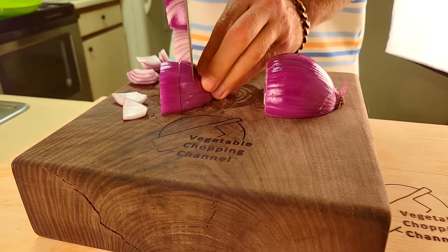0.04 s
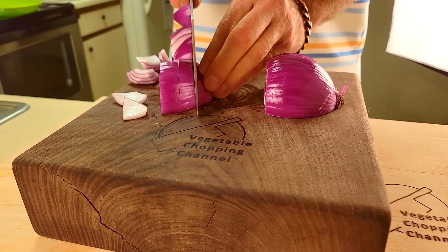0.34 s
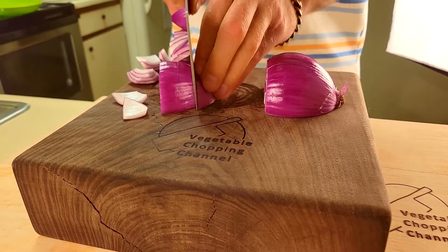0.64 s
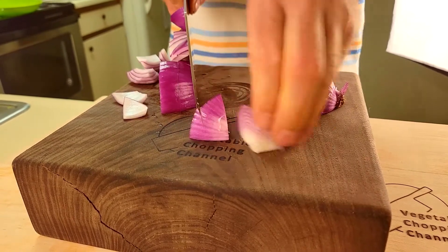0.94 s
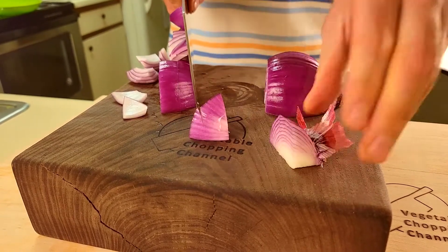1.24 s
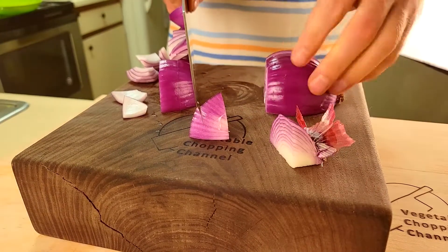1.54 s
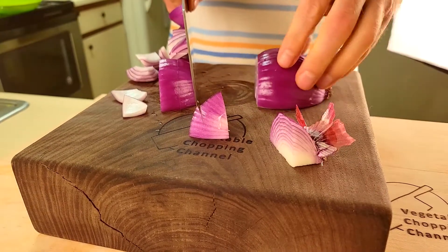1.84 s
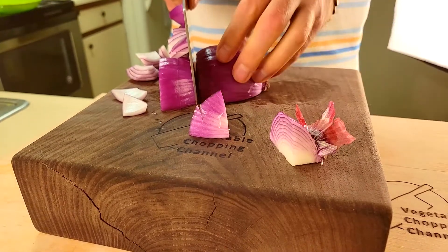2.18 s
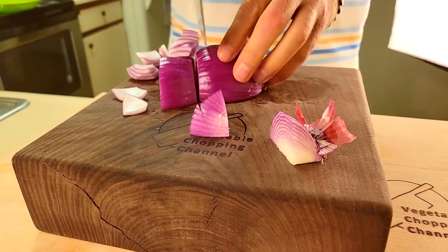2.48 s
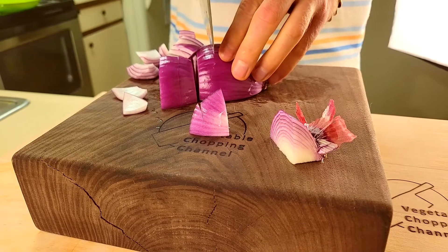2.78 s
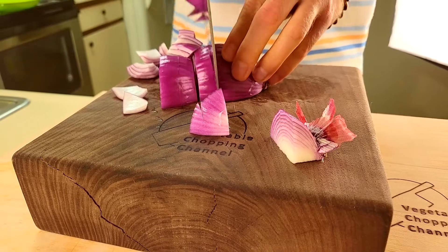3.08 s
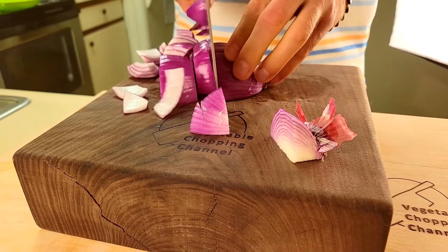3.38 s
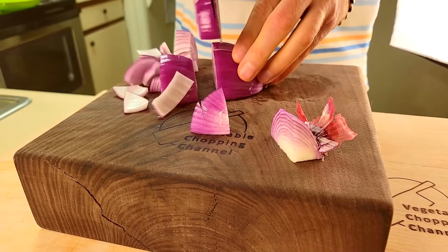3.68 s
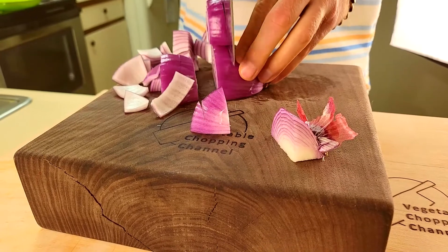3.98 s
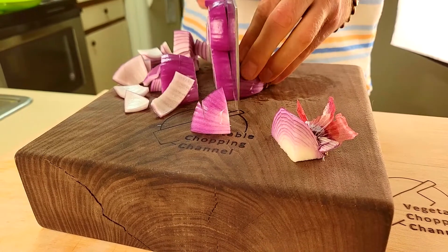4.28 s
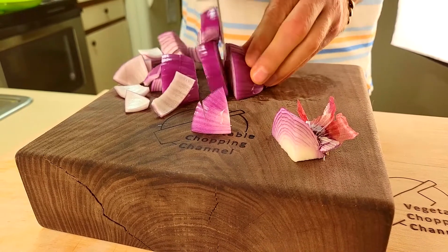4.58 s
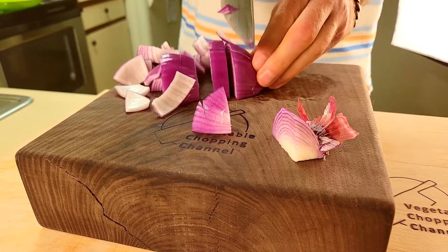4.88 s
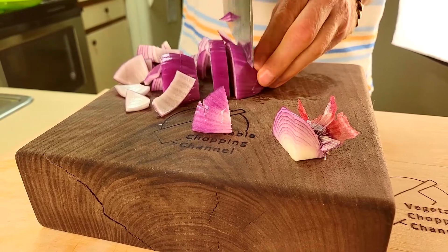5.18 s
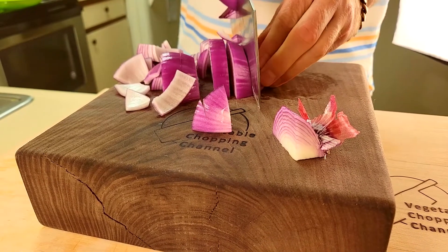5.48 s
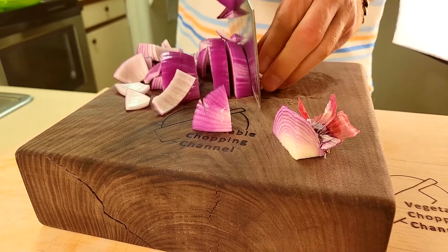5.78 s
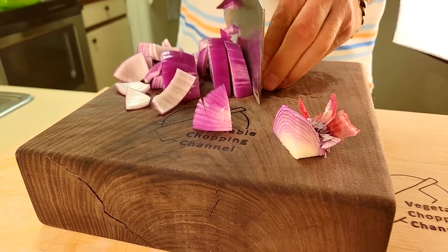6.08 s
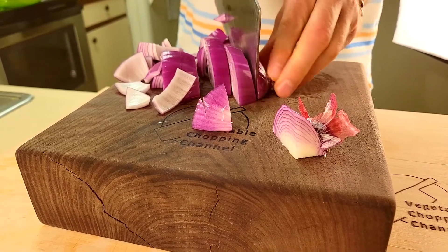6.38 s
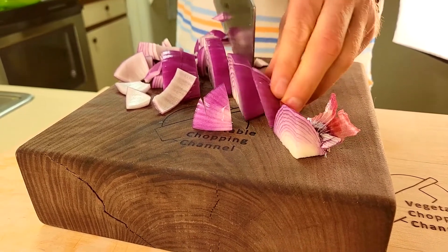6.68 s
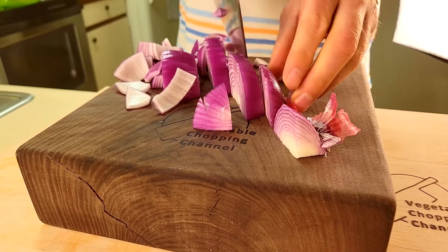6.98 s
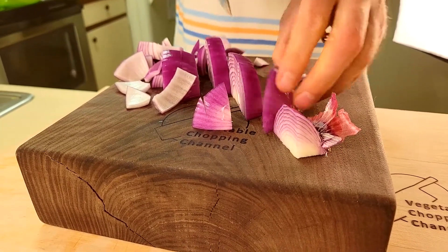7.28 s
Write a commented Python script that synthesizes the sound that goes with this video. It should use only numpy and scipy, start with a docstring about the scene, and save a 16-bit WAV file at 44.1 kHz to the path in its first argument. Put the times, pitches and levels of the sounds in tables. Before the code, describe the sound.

Close, unhurried onion slicing: skin snaps, juicy flesh crunches and the blade knocks on thick wood over a faint appliance hum.

```python
"""In a kitchen, a chef's knife slices a red onion on a thick wooden block, close to a stereo microphone.
The edge snaps the skin, crunches through countless wet cells and lands on the block with a thump.
The steel rings faintly. Between cuts the fingers shift the pieces, which rustle, creak and squeak
as they stick and slip. An appliance hums in the room."""
import sys
import numpy as np
from scipy import signal
from scipy.fft import rfft, irfft
from scipy.io import wavfile
from scipy.ndimage import uniform_filter1d

SR = 44100
rng = np.random.default_rng(int(sys.argv[2]) if len(sys.argv) > 2 else 0)


def store_pcm(level_fs):
    """Save levels as 16-bit WAV."""
    pcm = np.round(np.clip(level_fs, -1, 1) * 32767).astype(np.int16)
    wavfile.write(sys.argv[1], SR, np.atleast_2d(pcm).T)


N = 323253
TIME = np.arange(N) / SR

# The tone that thin skin and the blade's face give to bursting cells. Each row: frequency in Hz, gain in dB.
CELL_SPECTRUM = [(400, -30.5), (750, -14.5), (1050, -20), (1390, -7), (2050, -7), (2650, -7), (3250, -0.5),
                 (4100, -1), (5200, -3), (6500, -4.5), (9700, -11.5), (11200, -3), (12900, 7.5), (15800, 0)]
# The notes of the steel blade. Each row: pitch in Hz, relative level in dB, seconds to fade by 60 dB.
BLADE_NOTES = [(1498, -6, 0.18), (3760, -14.5, 0.18), (4270, 6, 0.037), (5660, -4, 0.13), (7105, 6, 0.028),
               (7820, -0.5, 0.059), (11400, -2, .03)]


def amp(db):
    """Turns decibels into a gain."""
    return 10 ** (np.asarray(db) / 20)


def unit(x):
    """Scales a signal to an average (rms) level of 1."""
    return x / np.sqrt(np.mean(x ** 2) + 1e-20)


def read(points, hz):
    """Reads a curve between its points, on a logarithmic frequency axis."""
    f, value = np.transpose(points)
    return np.interp(np.log(hz + 1), np.log(f + 1), value)


def add(mix, s, sound):
    """Mixes a sound in at s seconds."""
    part = mix[max(round(s * SR), 0):][:len(sound)]
    part += sound[:len(part)]


def band(x, lo_hz, hi_hz):
    """Keeps what lies between two frequencies."""
    return signal.sosfilt(signal.butter(3, [lo_hz, min(hi_hz, .49 * SR)], "band", fs=SR, output="sos"), x)


def colour(x, spectrum, size=2048):
    """Shapes the tone with a filter that lets clicks keep their sharp front."""
    log_gain = np.log(amp(np.maximum(read(spectrum, abs(np.fft.fftfreq(size, 1 / SR))), -90)))
    taps = np.fft.ifft(np.exp(np.conj(signal.hilbert(log_gain)))).real[:size // 2]
    return signal.oaconvolve(x, taps)[:len(x)]


def bursts(per_s, spread_db):
    """Random clicks: mostly tiny, a few large."""
    size = amp(spread_db * np.minimum(rng.exponential(1, N), 4.5))
    return unit(size * rng.choice([-1, 1], N) * (rng.random(N) < per_s / SR))


def three_bands(clicks, spectrum):
    """Colours clicks and splits them into equally strong bands: fleshy middle, crisp highs, top fizz."""
    x = colour(clicks, spectrum)
    return unit(band(x, 380, 2300)), unit(band(x, 2400, 10000)), unit(band(x, 10200, 19000))


def slide(start, length_s, skew=0.51, power=2.53):
    """The speed of one sliding movement: it rises quickly and falls gradually."""
    progress = np.linspace(0, 1, round(length_s * SR))
    speed = np.zeros(N)
    add(speed, start, abs(np.sin(np.pi * progress ** skew)) ** power)
    return speed


def hum_and_air(waver_db=0.85, hum_lag_s=0.00013, air_db=-55.5, shared_bass=0.95):
    """An appliance's mains hum wavers a little over soft room noise."""
    # The hum's tones. Each row: pitch in Hz, level in dB.
    hum_tones = [(119.5, -52), (240, -93)]
    # The room noise. Each row: frequency in Hz, relative level in dB.
    air_spectrum = [(15, -56.5), (25, -18.5), (70, -4), (123, -0.5), (148, -18.5), (174, -25.5), (211, -25),
                    (637, -40), (1390, -39), (2590, -46), (7420, -48.5), (9720, -56.5), (13400, -49),
                    (15800, -49)]
    waver = amp(waver_db * unit(band(rng.standard_normal(N), 0.87, 18.0)))
    stereo_time = TIME - [[hum_lag_s], [0]]
    hum = sum(amp(db) * np.sqrt(2) * np.sin(2 * np.pi * hz * stereo_time) for hz, db in hum_tones)
    left, right, both = (colour(rng.standard_normal(N), air_spectrum) for _ in range(3))
    bass = signal.butter(2, 300, fs=SR, output="sos")
    air = np.array([left, right])
    air += shared_bass * signal.sosfilt(bass, both - air)  # long waves reach both sides alike
    return waver * hum + amp(air_db) * unit(air)


def rustle(level_db=-3):
    """Damp skin catches and lets go in tiny slips as pieces slide on blade, block and fingers."""
    # Each row: start and length in seconds, relative level in dB, middle and fizz in dB against the highs.
    slides = [(0.0, 0.14, -58, -14, -3), (0.333, 0.19, -55.5, -0.5, -3), (0.455, 0.19, -79, 13, -4),
              (0.599, 0.12, -63, -7, -4), (0.68, 0.39, -76.5, -3, -5), (0.854, 0.4, -60.5, -19.5, 4),
              (1.13, 0.19, -74, -1, -4), (1.474, 0.09, -71.5, -2, -6), (1.74, 0.3, -76.5, -4, 1),
              (1.885, 0.53, -65, -11.5, -4.5), (2.301, 0.18, -66, -22, -10), (2.616, 0.22, -73.5, -1, -15),
              (3.191, .2, -57.5, 6, -8), (3.344, 0.38, -77, -3, -8), (3.657, 0.11, -69, 1, -12),
              (3.835, 0.17, -59, -2.5, -2), (4.287, 0.22, -59.5, 8.5, -12), (4.459, 0.077, -62, -7, -5),
              (4.517, 0.3, -71, 8, -1), (4.658, 0.18, -71, -13, -6), (4.867, 0.089, -47, -6.5, -6),
              (4.916, 0.15, -61, -9, -21), (5.03, .1, -54, -6, 5.5), (5.46, 0.15, -59, -6.5, -4),
              (5.58, 0.37, -79, -3, -1), (6.55, 0.3, -65, -7, -3), (6.867, 0.19, -77, -10, 4),
              (7.217, 0.19, -69, -17, -1)]
    # The tone of the rubbing. Each row: frequency in Hz, gain in dB.
    rub_spectrum = [(410, -26.5), (700, -12), (798, -4), (1090, -13), (1550, -7), (1960, -13.5),
                    (3180, -7.5), (4760, -7.5), (6100, -6), (9500, -14), (13000, -0.5), (15800, -8)]
    middle, crisp, fizz = three_bands(bursts(per_s=1100, spread_db=3.5), rub_spectrum)
    out = amp(-83.5) * (crisp + fizz)  # the fingers never rest entirely
    for start, length_s, db, middle_db, fizz_db in slides:
        out += amp(db) * slide(start, length_s) * (crisp + amp(middle_db) * middle + amp(fizz_db) * fizz)
    return amp(level_db) * out


def snaps(rise_s=0.00048, fade_s=0.0041, ticks_per_s=13, level_db=-1):
    """Tight skin gives way in a short rush of bursting cells. Damp skin also ticks faintly at random."""
    # Snaps and the louder wet ticks. Each row: start in seconds, relative level in dB,
    # boost of the middle in dB, boost of the fizz in dB.
    skin_snaps = [(0.028, -46, 5, -7), (0.074, -35.5, -24, -5), (0.086, -47.5, 11, -3), (0.874, -62, -4, 7),
                  (0.944, -53, -11, 8), (1.488, -55.5, -19, -5), (1.555, -62, 8.5, 0),
                  (1.735, -70, -11, 11), (2.197, -57.5, 0.5, 5), (2.26, -62.5, 0, -4), (2.348, -59, 4, -8),
                  (2.418, -53.5, -14, 1), (2.438, -53, -7, 2), (2.588, -36, 0.5, -1.5),
                  (2.745, -60, -6, -14), (2.798, -42, 4, -0.5), (3.19, -33, 0, -3), (3.436, -61, -1, -10),
                  (3.662, -56, -16, 4), (3.683, -56.5, 14.5, -14), (3.711, -59, -16, 2),
                  (3.836, -37.5, 0, -2.5), (3.877, -49.5, -1, -2), (4.274, -32.5, 2.5, 1),
                  (4.305, -62, 1, -5), (4.612, -61.5, 6, 6), (4.684, -56, -18, -7), (4.722, -62, -16, 7),
                  (4.782, -58.5, -14, 0), (5.045, -37.5, -1, -9), (5.16, -53, -9, -3),
                  (5.874, -63, -5, -20), (6.435, -62, -13, 2), (6.471, -43.5, -4, -9), (6.561, -47, 0, -10),
                  (6.71, -54.5, -3.5, -3), (6.734, -66.5, -9, 15), (6.943, -58.5, -7, -1),
                  (7.072, -64, -12, 3), (7.201, -63, -7.5, -10), (7.259, -55.5, -15, -5),
                  (7.271, -57, -16, 3)]
    middle, crisp, fizz = three_bands(bursts(per_s=9000, spread_db=0.5), CELL_SPECTRUM)
    tick_db = -76 + 3 * rng.standard_normal(N)
    ticks = [(TIME[i], tick_db[i], 0, 0) for i in np.flatnonzero(rng.random(N) < ticks_per_s / SR)]
    out = np.zeros(N)
    for start, db, middle_db, fizz_db in skin_snaps + ticks:
        part = slice(round(start * SR), round(start * SR) + SR // 8)
        t = TIME[part] - TIME[part][0]
        cells = crisp[part] + amp(middle_db - 6.5) * middle[part] + amp(fizz_db + 0.5) * fizz[part]
        add(out, start, amp(db) * cells * (1 - np.exp(-t / rise_s)) * np.exp(-t / fade_s))
    return amp(level_db) * out


def free_blade(skin, ring_db=-16):
    """Each snap sets the steel ringing faintly."""
    t = TIME[:SR // 3]
    ring = sum(amp(db - 60 * t / t60) * np.sin(2 * np.pi * hz * t) for hz, db, t60 in BLADE_NOTES)
    return amp(ring_db) * signal.oaconvolve(skin, ring / np.linalg.norm(ring))[:N]


def wedged_blade(cutting):
    """The blade, gripped and damped by the onion, lifts a few broad notes out of the cutting sound."""
    # Each row: pitch in Hz, width in Hz, gain in dB.
    damped_notes = [(1360, 100, 3.5), (2930, 250, -3), (3185, 80, 2), (3280, 177, -12), (3716, 110, -1.5),
                    (5880, 160, -4), (6400, 120, -9.5), (14070, 170, -26.5)]
    t = TIME[:SR // 20]
    ring = sum(amp(db) * 2 * np.pi * width / SR * np.exp(-np.pi * width * t) * np.cos(2 * np.pi * hz * t)
               for hz, width, db in damped_notes)
    return cutting + signal.oaconvolve(cutting, ring)[:N]


def stroke(start, deepest, end, swell_db, bite_s=0.0038, release_s=0.0033, ease_db_per_s=34.5):
    """A cut swells until the edge is deepest, then eases. Gives its on-off gain and dB below its peak."""
    t = np.arange(start, end + 8 * release_s, 1 / SR)
    gate = np.minimum((t - start) / bite_s, 1) * np.exp(-np.maximum(t - end, 0) / release_s)
    still_to_go = np.maximum((deepest - t) / (deepest - start), 0)
    under_db = swell_db * still_to_go ** 1.49 + ease_db_per_s * np.maximum(t - deepest, 0)
    return gate, under_db


def block_ring(rocking_db=0):
    """The block's notes: neighbours swing opposite ways, and the lowest is the whole block rocking."""
    # Each row: pitch in Hz, relative level in dB, seconds to fade by 60 dB.
    block_notes = [(44, -7.5, .32), (91, 2.5, .071), (92, -8, .18), (129, -10, .25), (245, -3.5, .147),
                   (318, -9, .09), (332, 5, .019), (450, -13, .07), (510, -9.5, .035), (685, -12, .04),
                   (800, -20, .025), (1040, -2.5, .02), (1360, -7.5, .026), (1890, -10, .016)]
    t = TIME[:SR // 2]
    notes = [(-1) ** k * amp(db - 60 * t / t60) * np.cos(2 * np.pi * hz * t)
             for k, (hz, db, t60) in enumerate(block_notes)]
    return amp(rocking_db) * notes[0] + sum(notes[1:])


def crunch(level_db=-3, shallow_fizz=0.14, shake_follows=0.58):
    """The edge bursts cells, unevenly as it meets layer after layer, and its drag shakes the block."""
    # Each row: start, deepest bite and end in seconds, relative level in dB, swell from the start in dB,
    # middle and fizz in dB against the highs, shaking of the block in dB.
    cuts = [(0.068, 0.155, 0.33, -42.5, 8.5, -9.5, -4.5, -48),
            (2.862, 3.097, 3.197, -40, 22.5, -12, -5.5, -55),
            (3.928, 4.253, 4.326, -41, 12, -9, -5.5, -57.5), (5.053, 5.283, 5.452, -43, 23, -8.5, -2, -52),
            (6.005, 6.224, 6.245, -55.5, 11.5, -11.5, -13, -68.5),
            (6.282, 6.317, 6.42, -56, 10, -10, -9, -77), (6.476, 6.55, 6.572, -52.5, 3.5, -15.5, 0, -62.5)]
    layers = amp(1.6 * unit(uniform_filter1d(rng.standard_normal(N), size=220)))
    cells = layers * bursts(per_s=7000, spread_db=3.8)
    middle, crisp, fizz = three_bands(cells, CELL_SPECTRUM)
    shaking = unit(band(signal.oaconvolve(cells, block_ring())[:N], 60, 520))
    out = np.zeros(N)
    for start, deepest, end, db, swell_db, middle_db, fizz_db, block_db in cuts:
        gate, under_db = stroke(start, deepest, end, swell_db)
        part = slice(round(start * SR), round(start * SR) + len(gate))
        fizz_gain = amp(fizz_db + shallow_fizz * under_db)  # a shallow bite has a larger share of fizz
        tearing = crisp[part] + amp(middle_db) * middle[part] + fizz_gain * fizz[part]
        drag = amp(block_db - shake_follows * under_db) * shaking[part]
        add(out, start, gate * (amp(level_db + db - under_db) * tearing + drag))
    return out


def thumps(crack_db=-3, crack_s=0.0057):
    """Blade or onion hits the block with a smooth push: the shorter the contact, the brighter the ring."""
    # Each row: start in seconds, strength in dB, contact time in milliseconds, boost of the rocking in dB.
    blows = [(0.3136, -18.5, 0.25, 0), (0.459, -15, 1.43, -6), (1.527, -25.5, 1.26, -22),
             (1.545, -28, 1.15, -24), (2.174, -24, 1.95, -14), (2.592, -34.5, 0.58, -1),
             (2.8, -24.5, 1.42, -20), (3.198, -13, .13, 0), (3.878, -20.5, 0.72, -31),
             (3.894, -22, 0.71, -10), (3.943, -38.5, 0.053, -5), (4.2, -29, 0.3, -22),
             (4.266, -31, 0.038, 10), (4.2882, -11, .05, -1), (4.615, -31, 0.89, -8),
             (4.863, -42.5, 0.69, -4), (5.457, -30.5, 0.28, 0), (6.478, -51, 0.63, 16),
             (6.675, -48.5, 0.32, 6.5), (7.035, -52, 0.12, -11)]
    out, t, ms = np.zeros(N), TIME[:SR // 2], 1000 * TIME[:SR // 40]
    high_notes = unit(band(rng.standard_normal(N), 680, 2100))  # so crowded that they blur into noise
    for start, db, contact_ms, rocking_db in blows:
        push = ms ** 2 * np.exp(-ms / contact_ms)
        crack = amp(crack_db) * np.roll(high_notes, round(start * SR))[:len(t)] * np.exp(-t / crack_s)
        add(out, start, amp(db) * signal.fftconvolve(block_ring(rocking_db) + crack, push / push.sum()))
    return out


def creak(level_db=-55.5):
    """As the fingers grip the onion, uneven slips ring a few faint, low notes."""
    # Each row: pitch in Hz, width in Hz, relative level in dB.
    creak_notes = [(292, 15, 1), (390, 65, -2), (560, 50, -12), (880, 74, -4)]
    t = TIME[:SR // 8]
    ring = sum(amp(db) * np.exp(-np.pi * width * t) * np.sin(2 * np.pi * hz * t)
               for hz, width, db in creak_notes)
    slips = signal.oaconvolve(bursts(per_s=260, spread_db=2.5), ring)[:N]
    return amp(level_db) * slide(start=1.752, length_s=0.17) * unit(band(slips, 305, 930))


def squeaks(reach_octaves=0.4):
    """Wet onion sticks and slips on the blade, ringing the notes near the pitch that each rub favours."""
    # Each row: start in seconds, length in seconds, level in dB, favoured pitch in Hz.
    rubs = [(1.913, 0.11, -67.5, 4400), (2.412, 0.024, -62.5, 7050), (2.423, 0.03, -69, 1700),
            (3.658, .02, -64, 7000), (6.878, 0.08, -71.5, 7050)]
    out, t = np.zeros(N), TIME[:SR // 4]
    slips = bursts(per_s=500, spread_db=1.5)
    for start, length_s, db, favoured_hz in rubs:
        run = slips[round(start * SR):round((start + length_s) * SR)]
        ring = sum(amp(note_db - 60 * t / t60) * np.sin(2 * np.pi * hz * t)
                   * np.exp(-(np.log2(hz / favoured_hz) / reach_octaves) ** 2)
                   for hz, note_db, t60 in BLADE_NOTES)
        add(out, start, amp(db) * signal.fftconvolve(unit(run), ring / np.linalg.norm(ring)))
    return out


def pair(x, lag_s):
    """Sound reaches the right side of the microphone a little later."""
    delay = np.exp(-2j * np.pi * np.fft.rfftfreq(N, 1 / SR) * lag_s)
    return np.array([x, irfft(rfft(x) * delay, N)])


def scatter(x, fade_s=0.0069, count=5):
    """Cells burst at ever-changing spots, each with its own quick echoes off blade, hand and block."""
    t = TIME[:SR // 30]
    weights = uniform_filter1d(rng.standard_normal((count, N)), size=200, axis=1)
    weights /= np.linalg.norm(weights, axis=0)
    echoes = rng.standard_normal((count, 2, len(t))) * np.exp(-t / fade_s)
    echoes /= np.linalg.norm(echoes, axis=2, keepdims=True)
    spots = weights * band(x, 400, 23700)
    return signal.oaconvolve(spots[:, None], echoes, axes=2).sum(0)[:, :N]


def kitchen(x, first_echo_s=0.0038):
    """The room's dense echoes: the highs die away sooner than the lows."""
    # Each row: frequency in Hz, seconds to fade by 60 dB.
    fade_times = [(100, 0.94), (400, 0.46), (1500, 0.24), (5000, 0.22), (14000, 0.18)]
    echoes = rng.standard_normal((2, SR * 2 // 3))
    echoes *= TIME[:echoes.shape[1]] > first_echo_s
    hz, t, bands = signal.stft(echoes, SR, nperseg=256)
    bands[1, hz < 300] = bands[0, hz < 300]  # both sides share the bass
    tail = signal.istft(bands * amp(-60 * t / read(fade_times, hz)[:, None]), SR, nperseg=256)[1]
    return signal.fftconvolve(x[None], tail / np.linalg.norm(tail[0]), axes=1)[:, :N]


def scene():
    """Onion, knife and block close by, the kitchen around them."""
    skin = snaps()
    onion = wedged_blade(crunch() + skin) + rustle()
    wood = thumps() + creak()
    steel = squeaks() + free_blade(skin)
    near = pair(onion + steel, lag_s=0.00013) + amp(1.5) * scatter(onion) + pair(wood, lag_s=0.00032)
    # the low thump stays dry and close; only the block's higher knock echoes in the room
    into_room = amp(-2) * (onion + steel) + amp(-10) * band(wood, 400, 6000)
    return near + kitchen(into_room) + hum_and_air()


def record(dry, top_hz=15950):
    """The microphone's two sides differ a little in tone, and the very highest treble is cut off."""
    # Each row: frequency in Hz, left level minus right level in dB.
    balance = [(100, -2), (600, -2), (1500, 0.5), (4500, -1.5), (9000, 4), (13500, -5)]
    tilt_db = read(balance, np.fft.rfftfreq(N, 1 / SR))
    heard = irfft(rfft(dry) * amp(np.array([tilt_db, -tilt_db]) / 2), N)
    low_pass = signal.firwin(511, top_hz, window=("kaiser", 9), fs=SR)
    return signal.oaconvolve(heard, low_pass[None], "same")


dry = scene()
out = record(dry)
store_pcm(out)
```